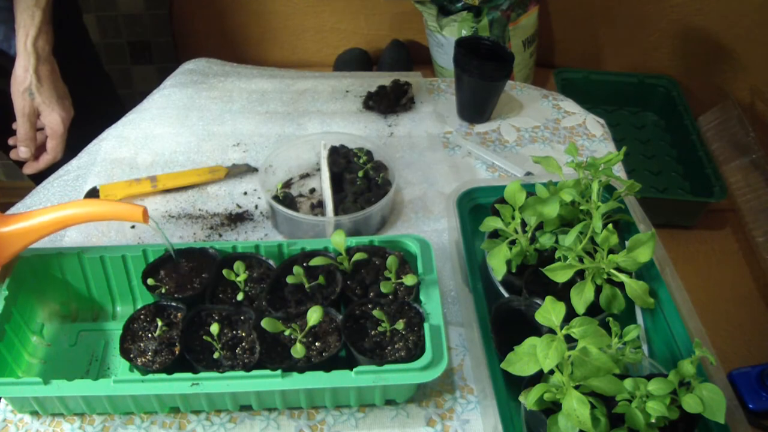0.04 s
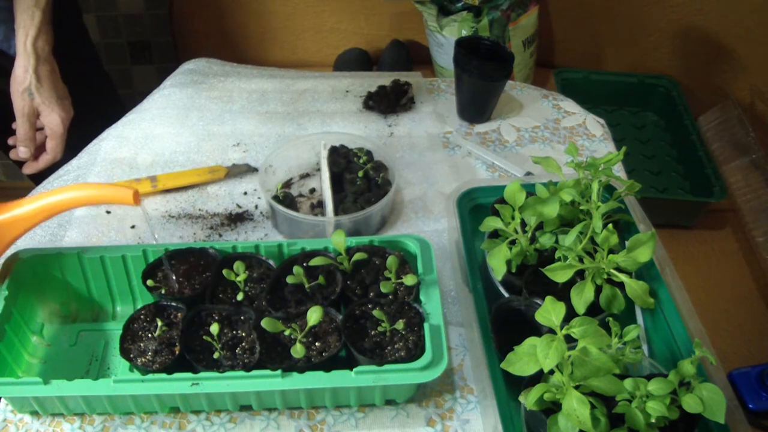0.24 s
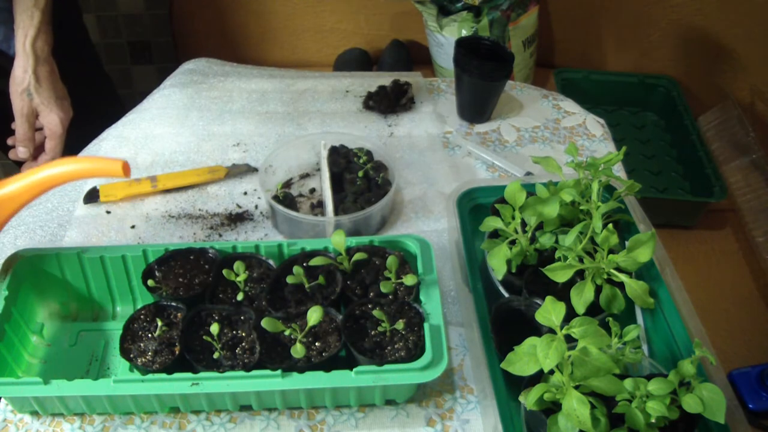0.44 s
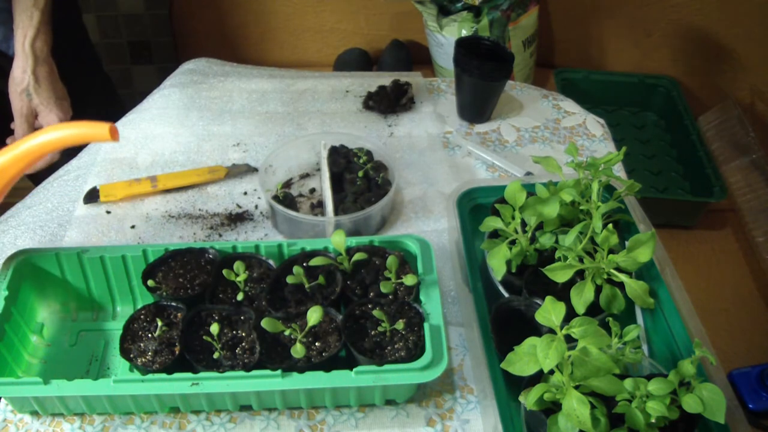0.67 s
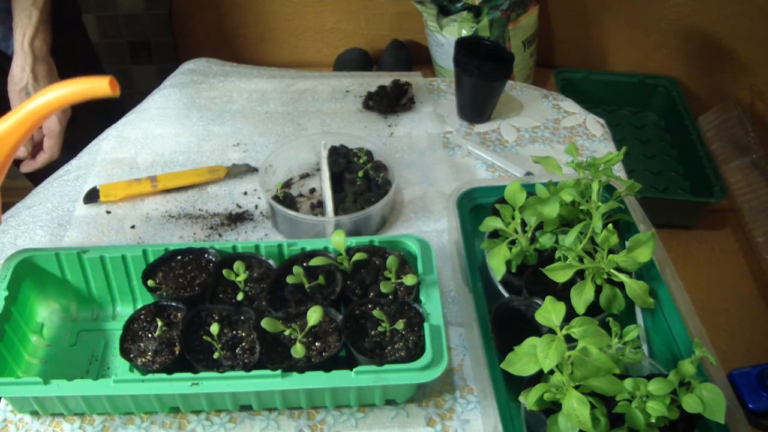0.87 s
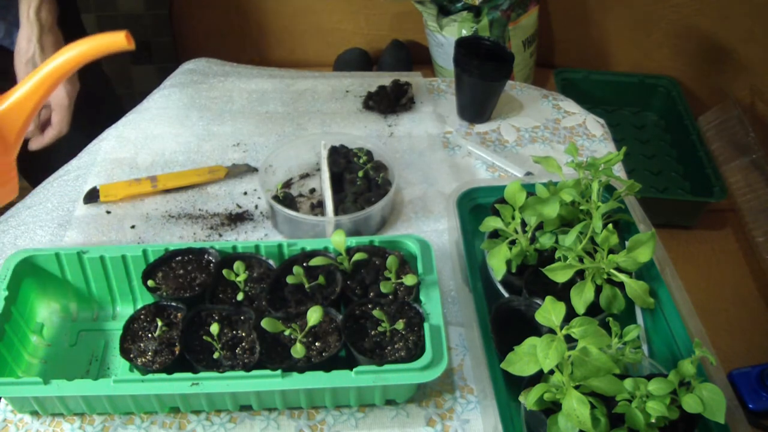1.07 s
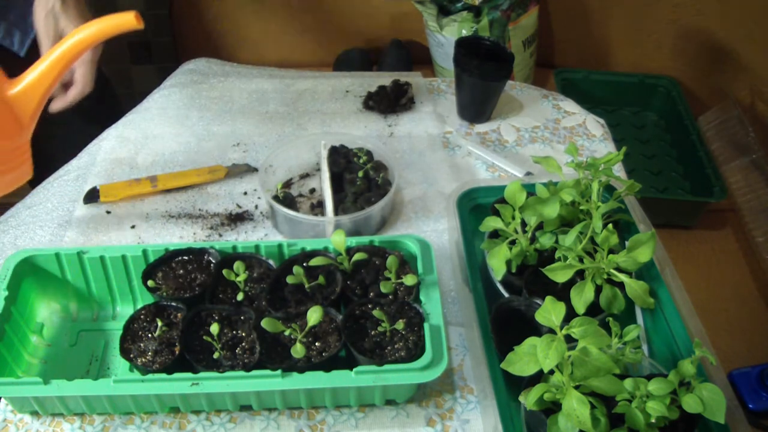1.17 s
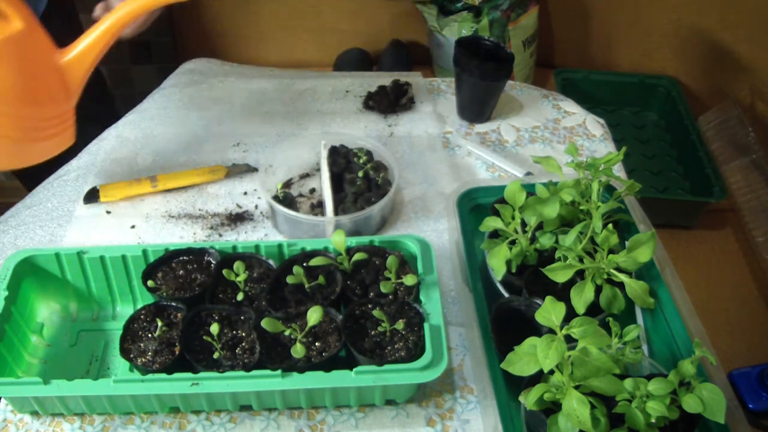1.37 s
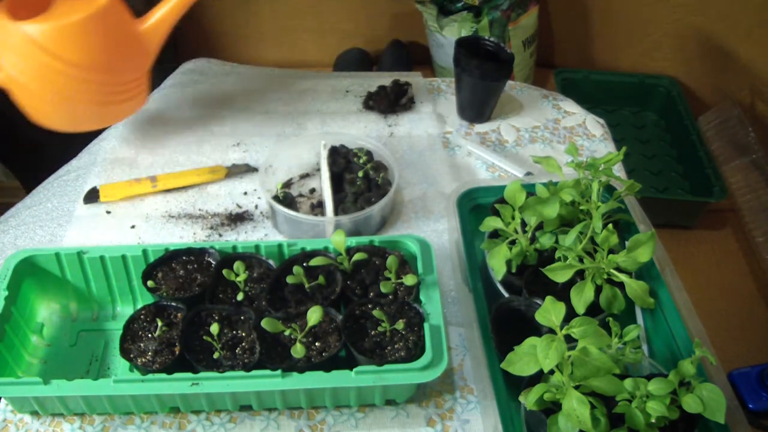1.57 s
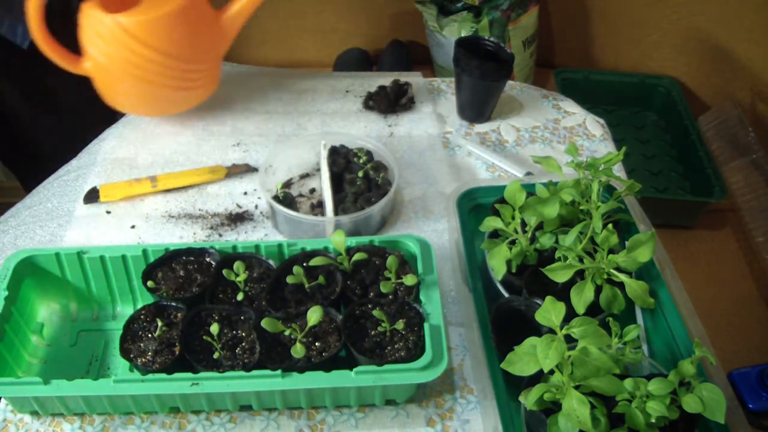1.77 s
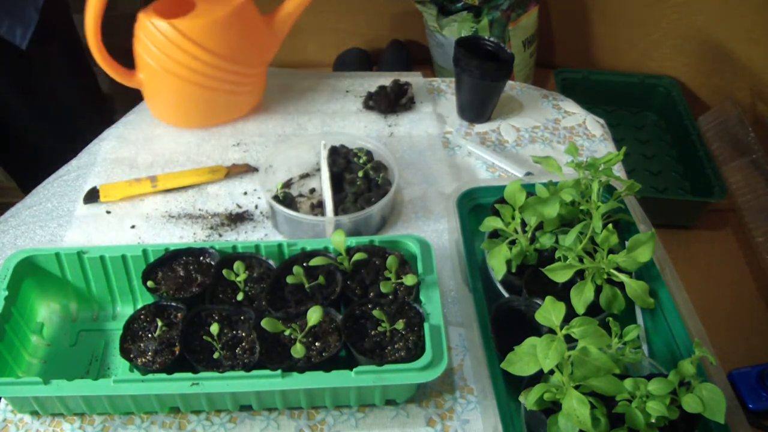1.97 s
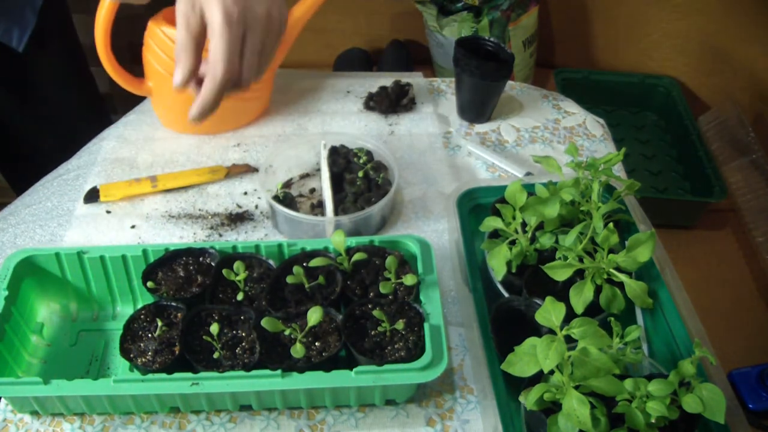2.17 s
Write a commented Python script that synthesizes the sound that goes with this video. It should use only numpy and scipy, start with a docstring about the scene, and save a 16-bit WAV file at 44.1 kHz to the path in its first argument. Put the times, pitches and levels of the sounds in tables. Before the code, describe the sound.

A plastic watering can clatters briefly, drips, and after a quiet pause scrapes softly onto a covered table

```python
"""A plastic watering can is lifted from a seedling cup in a small room with a faint hum and thin whine.
Hollow plastic scuffs, bumps and knocks once sharply: dispersed clicks and noise excite decaying modes.
The last drops land on damp soil as wet ticks and short damped oscillations.
A sleeve rustles, as swells of filtered noise, while the can swings back; its base then brushes the
tablecloth with grainy noise and the table thuds, a low damped pulse like the softer thuds before it."""
import sys
import numpy as np
from scipy import signal
from scipy.fft import rfft, irfft
from scipy.io import wavfile
from scipy.ndimage import uniform_filter1d

SR = 44100
rng = np.random.default_rng(int(sys.argv[2]) if len(sys.argv) > 2 else 0)


def materialize(psi):
    """Save the field psi as 16-bit PCM at rate SR to the path in sys.argv[1].

    A 1-D psi becomes a single channel; in a 2-D psi each row is a channel.
    """
    bounded = np.clip(np.atleast_2d(psi).T, -1, 1)
    quanta = np.round(bounded * 32767).astype(np.int16)
    wavfile.write(sys.argv[1], SR, quanta)


N = 97990
T, HZ = np.arange(N) / SR, np.fft.rfftfreq(N, 1 / SR)
EDGE_HZ = 16000  # upper limit of the whole sound

# Spectrum of the room air: pitch_hz, level_db
AIR_COLOUR = [(12, -22), (20, 4), (176, -3.5), (500, -7), (1180, -10.5), (1950, -16), (2800, -14.5),
              (12300, -22.5), (13700, -21), (15800, -33)]
# Likeness of left and right in steady noise: pitch_hz, likeness (0 to 1)
NOISE_LIKENESS = [(30, 0.6), (100, 0.14), (500, 0.74), (1600, 0.53), (5000, 0.26), (15000, 0.27)]
# Faint narrow bands of the hum: pitch_hz, width_hz (centre to quarter power), level_db
HUM_BANDS = [(175, 12, -65.5), (514, 27, -62.5), (965, 13, -63.5)]
# Wavering levels of the two clear tones of the hum: time_s, level_db
LOW_TONE_LEVELS = [(.55, -64), (.78, -56), (1.01, -61), (1.09, -58.5), (1.24, -69), (1.5, -64),
                   (1.585, -49), (1.65, -67), (1.72, -53), (1.9, -62.5), (2.2, -55)]
HIGH_TONE_LEVELS = [(1.3, -73.5), (1.58, -60.5), (1.69, -70), (1.795, -54.5), (1.9, -68)]
LOW_TONE_HZ, HIGH_TONE_HZ, WANDER_HZ = 490.8, 905, 4.9  # wander is rms
AIR_DB, WHINE_HZ, WHINE_DB = -48.5, 15650, -63.5

# Dull bumps of the plastic: start_s, level_db (energy), dull_above_hz
BUMPS = [(0.05, -17, 1500), (0.0602, -14.5, 2500), (0.0703, -3.5, 650), (.084, -11, 600),
         (0.0929, -6.5, 2600), (.102, -12, 900)]
# Spectrum of a bump: pitch_hz, level_db
BUMP_COLOUR = [(60, -26), (140, -7), (195, 2.5), (300, -2.5), (500, 9.5), (1000, -1.5), (2200, -9),
               (5000, -24), (15000, -30)]
# Plastic scuffs between the bumps: peak_s, level_db, rise_s, fall_s (to 1/e)
SCUFFS = [(.053, -39, 0.0016, 0.0037), (0.0606, -34, 0.012, 0.01), (0.072, -35.5, 0.0031, 0.0055),
          (0.0937, -30.5, 0.0016, 0.0062), (0.1368, -33, 0.0044, 0.0032)]
# Spectrum of a scuff: pitch_hz, level_db
SCUFF_COLOUR = [(100, -10), (500, 10), (2100, 1), (4500, -7.5), (8000, -10), (16000, -24)]
# Modes of the hollow plastic: pitch_hz, level_db (relative to the blow), t60_s
SHELL_MODES = [(305, -37, .28), (405, -32, .25), (461, -29, .28), (565, -28, .25), (736, -31, .25),
               (787, -27, .24), (837, -26, .26), (919, -30, .25), (985, -29, .24), (2105, -30, .18),
               (3468, -27, .12), (3773, -33, .16)]
SHELL_KNOCK_DB, SHELL_BUMP_DB, SHELL_ATTACK_S = 3, -7.5, 0.0013
SPREAD_S = 0.001204  # bending waves smear a contact: how late 1 kHz arrives

# Soft low thuds, the loudest being the table taking the weight: start_s, pitch_hz, level_db, time_to_peak_s
THUDS = [(0.061, 194, -37, 0.025), (1.204, 164, -45, 0.011), (2.046, 37.6, -29, 0.03),
         (2.123, 92, -44, 0.022)]

# Contacts within the sharp knock: start_s, level_db (relative energy), dull_above_hz
KNOCK_CONTACTS = [(0.1393, 0, 12000), (.1401, 4, 12100), (0.1423, 1, 12000), (0.1534, -4, 1480)]
# Spectrum of the knock: pitch_hz, level_db
KNOCK_COLOUR = [(60, -18.5), (150, -2), (330, -2.5), (850, 4.5), (1400, -0.5), (2800, -4), (3600, 0),
                (5000, -2), (8200, -2.5), (9000, -13), (14000, -22.5), (16000, -40)]
# Grit crushed in the hardest contact
CRUNCH_DB, CRUNCH_RISE_S, CRUNCH_FALL_S = -16.5, 0.0016, 0.0082

# Tiny wet ticks: start_s, level_db (energy)
TICKS = [(.2685, -29), (.3045, -33), (.3335, -21)]
# Spectrum of a tick: pitch_hz, level_db
TICK_COLOUR = [(200, -20), (2000, -12), (7500, 3), (15000, -6)]
# Drops on the soil: start_s, level_db, pitch_hz, time_to_peak_s
DROPS = [(0.2706, -39, 2430, 0.0012), (0.305, -28.5, 2070, 0.00059), (.3337, -33, 7400, 0.00022),
         (0.3386, -30.5, 6860, 0.0002)]

# Brushes of the sleeve as the arm swings: peak_s, level_db, rise_s, fall_s (to 1/e), dull_above_hz
RUSTLES = [(1.0, -53.5, .2, 0.069, 9000), (1.06, -49, 0.08, 0.044, 12000), (1.41, -52, 0.028, 0.019, 3480),
           (1.605, -52.5, 0.07, 0.03, 7140), (1.74, -53.5, .03, 0.033, 2980),
           (1.86, -52.5, 0.049, 0.043, 3500)]
# Spectrum of the cloth: pitch_hz, level_db
RUSTLE_COLOUR = [(100, -18), (500, -20.5), (1500, 0), (3500, 1.5), (7000, -0.5), (11000, -0.5),
                 (16000, -43)]

# Levels of the base rubbing on the cloth: time_s, hiss_db, hollow_murmur_db
SLIDE = [(1.957, -58, -65), (1.975, -42.5, -47), (1.996, -38, -42), (2.033, -31.5, -57), (2.055, -44, -64),
         (2.075, -45.5, -48), (2.11, -49, -63), (2.15, -47.5, -60), (2.22, -58.5, -60)]
# Spectra of the hiss and of the hollow murmur: pitch_hz, level_db
SLIDE_COLOUR = [(300, -12), (1100, -7), (1950, -1.5), (2700, -5.5), (4300, 1), (5400, -3.5), (7500, 0),
                (13000, -5.5), (16000, -14.5)]
BODY_COLOUR = [(60, -12), (170, 5.5), (300, 9), (400, -1.5), (520, 7.5), (800, -1.5), (4000, -41)]
SLIDE_GRAIN_DB = 2.4

# Reverberation time: pitch_hz, t60_s
ROOM_DECAY = [(100, 0.43), (300, 0.22), (600, 0.26), (3700, 0.14), (7000, 0.2), (14000, 0.2)]
# Spectrum of the reflections: pitch_hz, level_db
ROOM_COLOUR = [(100, 2), (700, 1.5), (3000, 2.5), (6500, -1.5), (9000, -6.5), (15000, 3.5)]
# Likeness of left and right in the reflections: pitch_hz, likeness (0 to 1)
ROOM_LIKENESS = [(100, 0.99), (1000, 0.97), (3000, 0.97), (8000, 0.41), (15000, 0.31)]
ROOM_BUILD_S = 0.0022
ROOM_HOLD_S = 0.018  # early reflections keep the level up before it falls
BUMP_ROOM_DB, KNOCK_ROOM_DB, DROP_ROOM_DB, SLIDE_ROOM_DB = -2.5, -1.5, -3, -0.5
RIPPLE_HZ, BROAD_HZ = 190, 1500  # smoothing widths: chance ripple and broad colour
PLASTIC_PAN_DB, CAN_PAN_DB, AIR_PAN_DB = -2.5, -1.5, -0.75  # left minus right


def amp(db):
    """Level: an amplitude ratio is ten to the power of its decibels over twenty."""
    return 10 ** (np.asarray(db) / 20)


def unit(x):
    """Normalization: the signal is scaled to rms 1."""
    return x / np.sqrt(np.mean(x ** 2) + 1e-20)


def read(points, hz):
    """Interpolation: a table is read on a log-frequency axis."""
    f, value = np.transpose(points)
    return np.interp(np.log(hz + 1), np.log(f + 1), value)


def pan(db):
    """Level difference: left and right gains share the decibels in opposite senses."""
    return amp(np.array([[db], [-db]]) / 2)


def pair(z, likeness, hz):
    """Partial coherence: a shared part and a private part make two spectra alike by band."""
    c = np.clip(read(likeness, hz), 0, 1)
    return np.array([z[0], c * z[0] + np.sqrt(1 - c ** 2) * z[1]])


def noise(colour_db):
    """Filtered noise: a steady random signal takes a given spectrum, left and right partly alike."""
    white = rfft(rng.standard_normal((2, N)))
    return unit(irfft(pair(white, NOISE_LIKENESS, HZ) * amp(colour_db), N))


def causal(colour_db):
    """Minimum phase: folding the cepstrum gives a filter that never sounds early."""
    cepstrum = irfft(np.log(amp(colour_db)), N)
    cepstrum[1:N // 2] *= 2
    cepstrum[N // 2 + 1:] = 0
    return np.exp(rfft(cepstrum))


def dull(hz):
    """Softness of contact: a first-order treble roll-off, in dB."""
    return -10 * np.log10(1 + (HZ / hz) ** 2)


def click(s, db, colour_db):
    """Dispersion of bending waves: the treble of a contact arrives before its bass."""
    lag = 4 * np.pi * SPREAD_S * np.sqrt(1000 * HZ)  # phase; the delay falls as 1 / sqrt(frequency)
    shape = irfft(causal(colour_db) * np.exp(-1j * lag), N)
    delayed = np.r_[np.zeros(round(s * SR)), shape][:N]
    return amp(db) * delayed / np.linalg.norm(shape)


def pulse(s, hz, db, rise):
    """Damped oscillation: a vibration swells to its peak and dies away."""
    u = np.maximum(T - s, 0) / rise
    return amp(db) * (u * np.exp(1 - u)) ** 2 * np.sin(2 * np.pi * hz * (T - s))


def swell(s, db, rise, fall):
    """Envelope: a straight rise to a peak and an exponential fall."""
    return amp(db) * np.clip(1 + (T - s) / rise, 0, 1) * np.exp(-np.maximum(T - s, 0) / fall)


def grainy(db, size):
    """Stick and slip: rubbing is uneven, given as a random gain of rms 1."""
    return unit(amp(db * unit(uniform_filter1d(rng.standard_normal(N), size=size))))


def even(x):
    """Spectral smoothing: chance peaks and holes of a burst are ironed out, its broad colour kept."""
    z = rfft(np.atleast_2d(x), N)
    power = abs(z[0]) ** 2
    fine = uniform_filter1d(power, size=round(RIPPLE_HZ * N / SR))
    broad = uniform_filter1d(power, size=round(BROAD_HZ * N / SR))
    return irfft(z * causal(10 * np.log10(broad / fine)), N)


def room(x, wet_db):
    """Reverberation: direct sound is joined by dense reflections that build up and die by band."""
    hz, t, z = signal.stft(rng.standard_normal((2, SR // 2)), SR, nperseg=256)
    hz = hz[:, None]
    decay_db = -60 * (np.hypot(t, ROOM_HOLD_S) - ROOM_HOLD_S) / read(ROOM_DECAY, hz)
    z = pair(z, ROOM_LIKENESS, hz) * amp(read(ROOM_COLOUR, hz) + decay_db)
    tail = signal.istft(z, SR, nperseg=256)[1]
    build = 1 - np.exp(-(T[:tail.shape[1]] / ROOM_BUILD_S) ** 2)
    tail = even(tail * build)[:, :SR // 2]
    tail = tail / np.linalg.norm(tail[0])
    return x + amp(wet_db) * signal.fftconvolve(x[None], tail, axes=1)[:, :N]


def tone(hz, levels):
    """Frequency modulation: a line of the hum wanders a little in pitch as it swells and fades."""
    wander = unit(uniform_filter1d(rng.standard_normal(N), size=3000))
    phase = 2 * np.pi * np.cumsum(hz + WANDER_HZ * wander) / SR
    return amp(np.interp(T, *np.transpose(levels))) * unit(np.sin(phase))


def background():
    """Superposition: room air, narrow hum bands, two wavering tones and a thin electrical whine add."""
    air = amp(AIR_DB) * noise(read(AIR_COLOUR, HZ))
    # equal shapes over their widths, so that each band keeps its own power
    bands = sum(amp(db) ** 2 / width / (1 + ((HZ - hz) / width) ** 2) ** 2 for hz, width, db in HUM_BANDS)
    hum_power = sum(amp(db) ** 2 for _, _, db in HUM_BANDS)
    hum = noise(10 * np.log10(bands)) * np.sqrt(hum_power)
    tones = tone(LOW_TONE_HZ, LOW_TONE_LEVELS) + tone(HIGH_TONE_HZ, HIGH_TONE_LEVELS)
    whine = amp(WHINE_DB) * np.sin(2 * np.pi * WHINE_HZ * T)
    return air + hum + tones + whine


def shell(s, db, dull_hz):
    """Modal resonance: one blow rings the hollow plastic, neighbouring modes in opposite senses."""
    t = np.maximum(T[:SR] - s, 0)
    ring = np.zeros(SR)
    for k, (hz, level, t60) in enumerate(SHELL_MODES):
        softness = 1 / (1 + (hz / dull_hz) ** 2)
        decay = amp(db + level - 60 * t / t60)
        ring += (-1) ** k * softness * decay * np.sin(2 * np.pi * hz * t)
    attack = 1 - np.exp(-(t / SHELL_ATTACK_S) ** 2)
    return np.pad(ring * attack, (0, N - SR))


def bumps():
    """Contact stiffness: the softer a contact the duller it is; short friction scuffs lie between."""
    colour = read(BUMP_COLOUR, HZ)
    blows = sum(click(s, db, colour + dull(hz)) for s, db, hz in BUMPS)
    scuffs = noise(read(SCUFF_COLOUR, HZ))[0] * grainy(db=3, size=30) * sum(swell(*row) for row in SCUFFS)
    ringing = sum(shell(s, db + SHELL_BUMP_DB, hz) for s, db, hz in BUMPS)
    return room(blows + scuffs, BUMP_ROOM_DB) + ringing


def thuds():
    """Damped low modes: each soft thud is one slow pulse of vibration."""
    return sum(pulse(*row) for row in THUDS)


def knock():
    """Impulsive excitation: a hard chattering contact cracks, crunches and sets the plastic ringing."""
    crack = sum(click(s, db, dull(hz)) for s, db, hz in KNOCK_CONTACTS)
    hardest_s = KNOCK_CONTACTS[1][0]
    crunch = rng.standard_normal(N) * swell(hardest_s, CRUNCH_DB, CRUNCH_RISE_S, CRUNCH_FALL_S)
    colour = read(KNOCK_COLOUR, HZ)
    blow = irfft(rfft(even(crack + crunch)[0]) * causal(colour), N)
    blow = blow / np.sqrt(np.mean(amp(colour) ** 2))  # the filter has unit energy
    return room(blow, KNOCK_ROOM_DB) + shell(KNOCK_CONTACTS[0][0], SHELL_KNOCK_DB, EDGE_HZ)


def drops():
    """Impact and damped oscillation: the last drops tick on the soil and plip for a few cycles."""
    ticks = sum(click(s, db, read(TICK_COLOUR, HZ)) for s, db in TICKS)
    plips = sum(pulse(s, hz, db, rise) for s, db, hz, rise in DROPS)
    return room(ticks + plips, DROP_ROOM_DB)


def sleeve():
    """Friction of fibres: cloth noise comes in soft swells, some duller than others."""
    cloth = read(RUSTLE_COLOUR, HZ)
    rustle = 0
    for s, db, rise, fall, hz in RUSTLES:
        duller = -10 * np.log10(1 + (HZ / hz) ** 4)  # second-order roll-off
        rustle = rustle + noise(cloth + duller) * swell(s, db, rise, fall)
    return rustle


def set_down():
    """Sliding friction: the base rubs the cloth with a grainy hiss and a brief hollow murmur."""
    s, hiss_db, body_db = np.transpose(SLIDE)
    hiss = noise(read(SLIDE_COLOUR, HZ)) * grainy(SLIDE_GRAIN_DB, size=70) * amp(np.interp(T, s, hiss_db))
    murmur = noise(read(BODY_COLOUR, HZ)) * amp(np.interp(T, s, body_db))
    rub = (hiss + murmur) * (T > s[0])
    reflections = room(rub[0], SLIDE_ROOM_DB) - rub[0]
    return rub + reflections


def scene():
    """Superposition: all sources add, a little to the right."""
    plastic_and_water = pan(PLASTIC_PAN_DB) * (bumps() + knock() + drops())
    can = pan(CAN_PAN_DB) * (thuds() + set_down())
    return pan(AIR_PAN_DB) * (background() + sleeve()) + plastic_and_water + can


def record(dry):
    """Band limitation: a linear-phase low-pass filter ends the spectrum at its upper edge."""
    low_pass = signal.firwin(511, EDGE_HZ, window=("kaiser", 9), fs=SR)
    return signal.oaconvolve(dry, low_pass[None], "same")


dry = scene()
out = record(dry)
materialize(out)
```